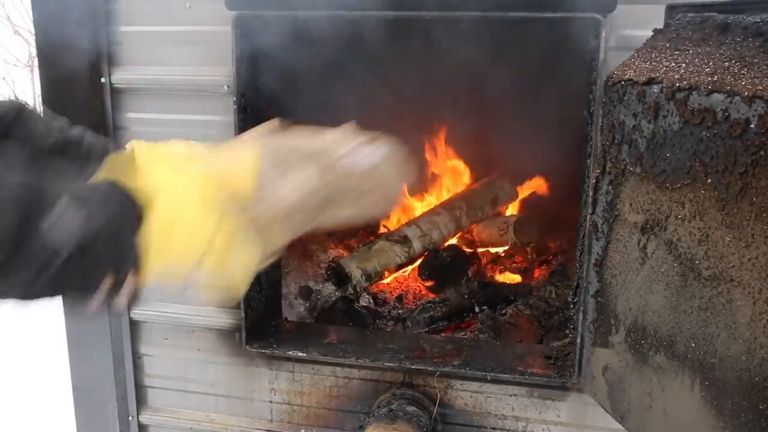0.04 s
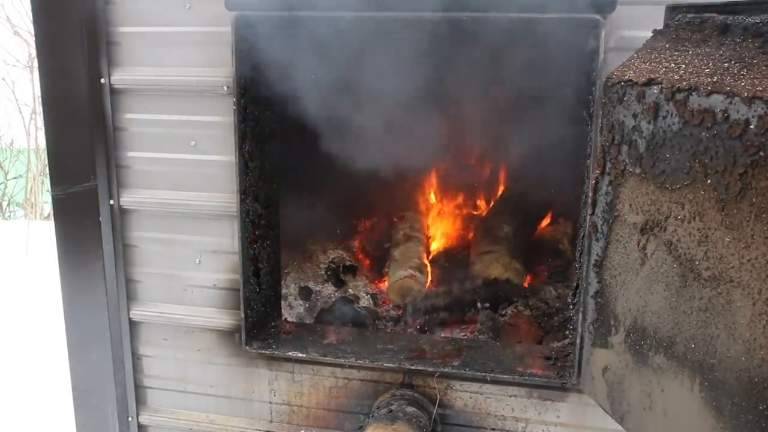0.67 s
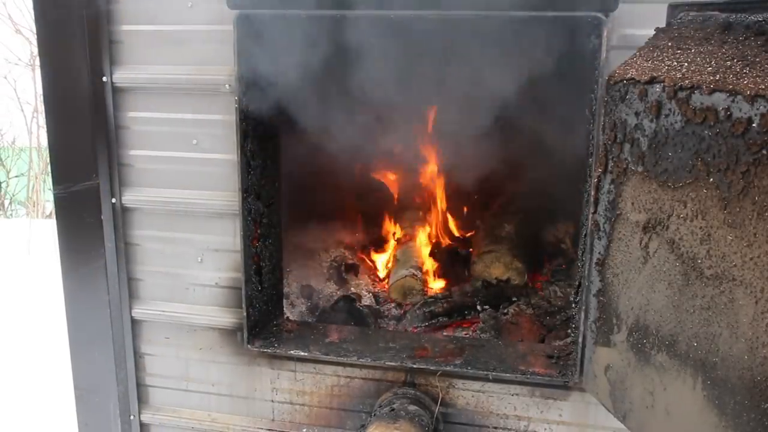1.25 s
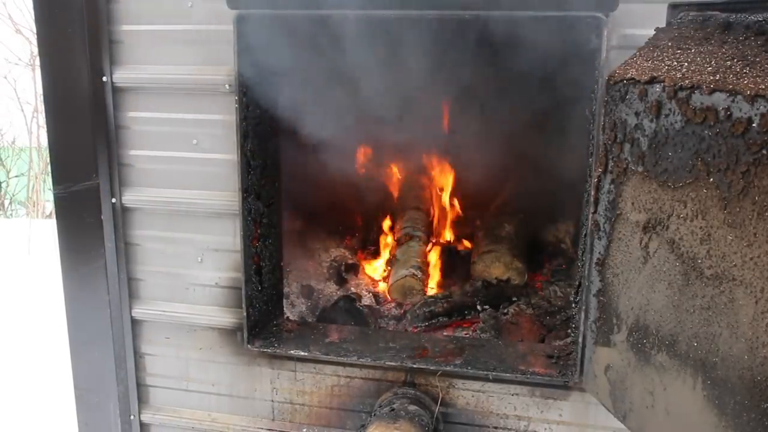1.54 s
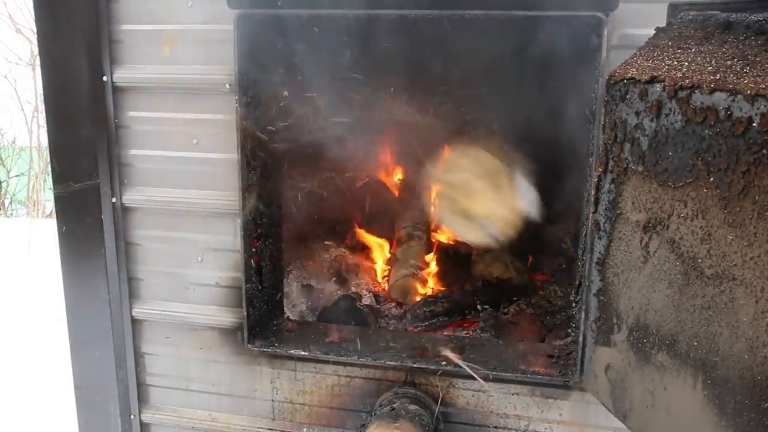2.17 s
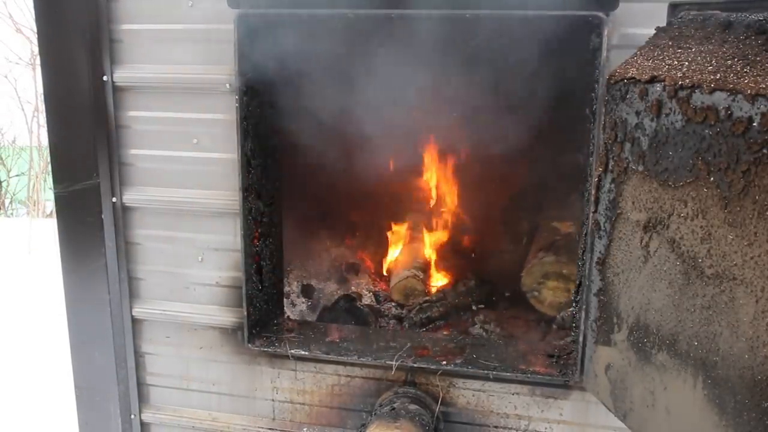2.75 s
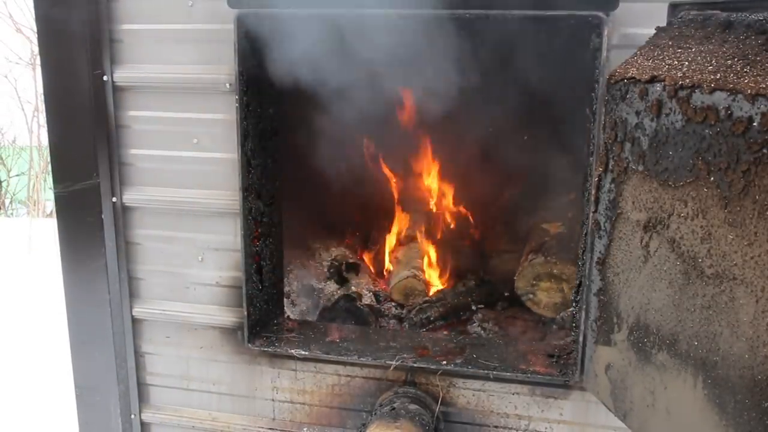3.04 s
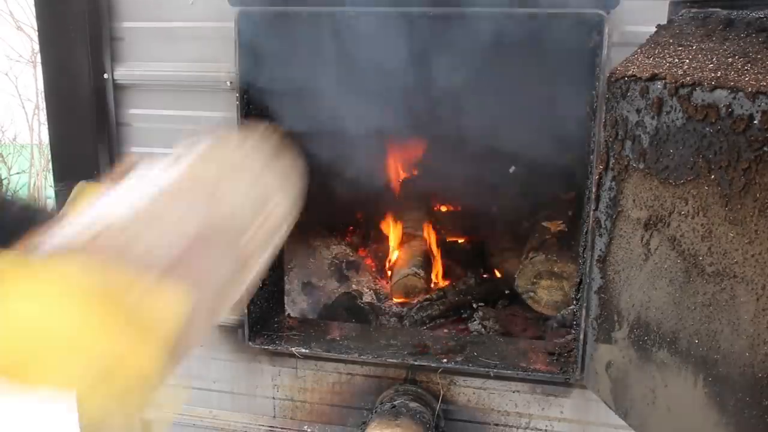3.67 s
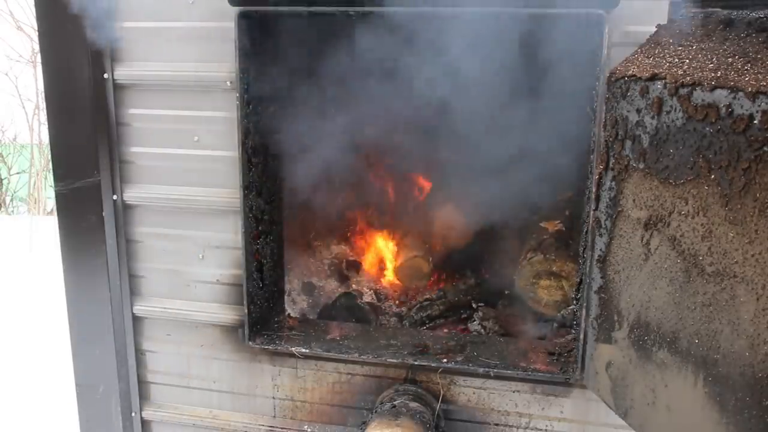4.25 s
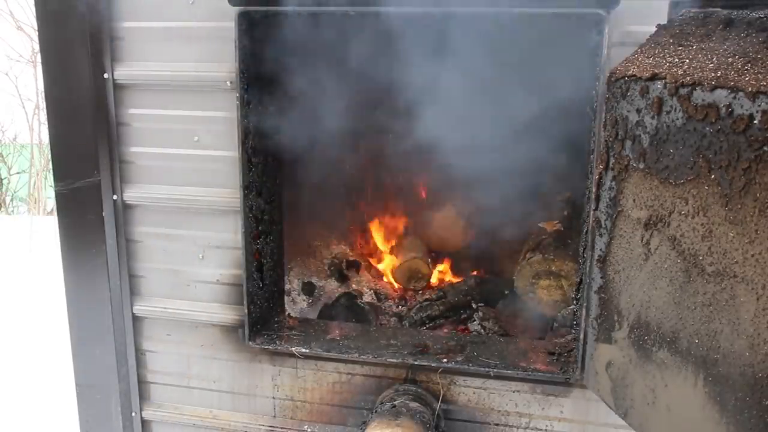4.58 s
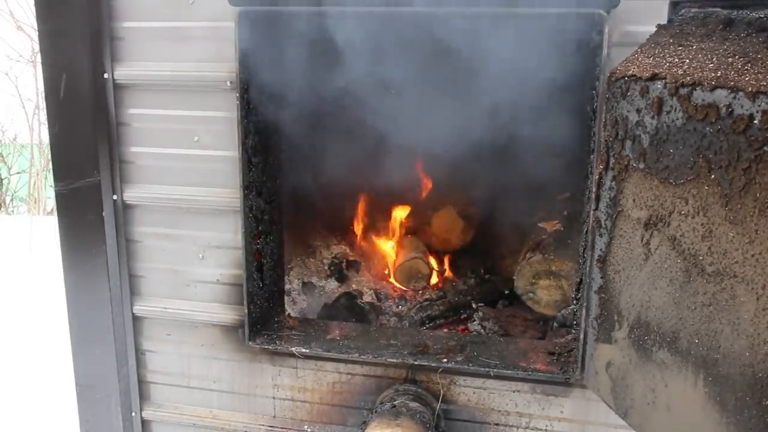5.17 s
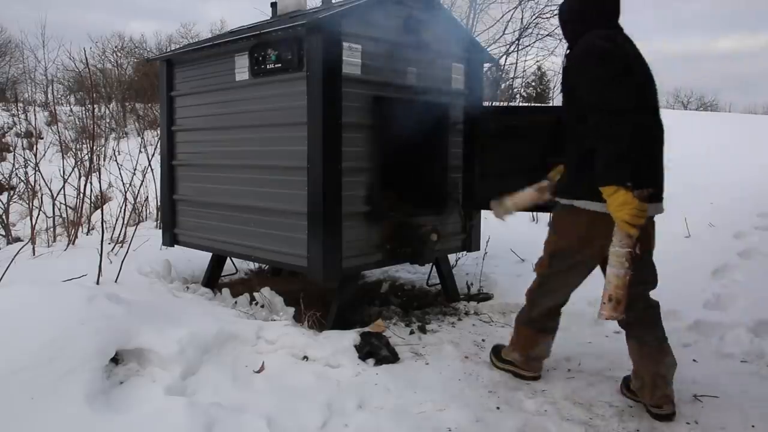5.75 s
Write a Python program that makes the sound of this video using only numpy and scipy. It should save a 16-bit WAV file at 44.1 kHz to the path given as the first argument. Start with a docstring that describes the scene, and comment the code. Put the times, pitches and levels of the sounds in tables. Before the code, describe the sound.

Outdoors, right in front of a steel firebox, three logs are tossed one after another into a popping fire. Each lands with a sharp wooden knock, crushing charcoal and stirring a brief surge of flame and sizzle; the second also makes the metal wall boom. A jacket swishes and a glove rasps on bark with the later throws. Footsteps crunch in snow in between and at the end, as the fire grows quieter.

```python
"""A fire pops and sizzles in an outdoor wood furnace, while boots crunch in snow and a jacket swishes.
At 0.4 s a split log lands in the steel firebox, knocks on the burning wood and crushes the coals.
At 2 s a glove rasps as it lets go of a second log, which makes the wall boom. Thin squeaks follow.
A third log lands at 4.2 s. Like the others it stirs up the embers; then more steps crunch in the snow."""
import sys
import numpy as np
from scipy import signal
from scipy.fft import rfft, irfft, next_fast_len
from scipy.io import wavfile
from scipy.ndimage import uniform_filter1d, minimum_filter1d

SR = 44100
rng = np.random.default_rng(int(sys.argv[2]) if len(sys.argv) > 2 else 0)


def dump(signal):
    """Clip the signal to [-1, 1] and save it as 16-bit WAV at the path in sys.argv[1]."""
    limited = np.clip(np.atleast_2d(signal).T, -1, 1)
    pcm = np.round(limited * 32767).astype(np.int16)
    wavfile.write(sys.argv[1], SR, pcm)


N = 265349
TIME = np.arange(N) / SR

# The hiss of stirred embers and of packed snow. Each row: frequency in Hz, level in dB.
FINE_HISS = [(1200, -31.5), (2200, -10.5), (4000, -11.5), (6000, -11), (9000, -16), (12000, -27.5),
             (16000, -38)]


def from_db(db):
    """Turn decibels into a factor to multiply a sound by."""
    return np.exp(np.asarray(db) * (np.log(10) / 20))


def rms_one(x):
    """Scale a sound to an average power of 1."""
    return x / np.sqrt(np.mean(x ** 2) + 1e-20)


def add(track, start_s, sound):
    """Mix a sound into a track at the given time."""
    start = int(start_s * SR)
    track[start:start + len(sound)] += sound[:N - start]


def band(x, low_hz, high_hz):
    """Gently turn down everything outside two frequencies."""
    return signal.sosfilt(signal.butter(1, [low_hz, min(high_hz, .45 * SR)], "band", fs=SR, output="sos"), x)


def swell(age, rise_s, hold_s, fade_s):
    """A level that rises, holds and fades. A fade time, here and below, is the time to drop 60 dB."""
    return np.clip(age / rise_s, 0, 1) * from_db(-60 * np.maximum(age - hold_s, 0) / fade_s)


def coloured(x, spectrum):
    """Shape the tone of a noise with rows of frequency in Hz and level in dB; its power becomes 1."""
    hz, db = np.transpose(spectrum)
    hz = np.r_[hz[0] / 4, hz, hz[-1] * 4]
    db = np.r_[db[0] - 30, db, db[-1] - 30]
    size = next_fast_len(N, real=True)
    log_hz = np.log(np.fft.rfftfreq(size, 1 / SR) + 1)
    gain = from_db(np.interp(log_hz, np.log(hz), db))
    return rms_one(irfft(rfft(x, size) * gain, size)[:N])


def grainy(size, per_s, spread_db):
    """Noise whose strength jumps from one tiny slip or break to the next."""
    noise = rng.standard_normal(size)
    grains = rng.standard_normal(size // 4 + 2).clip(-2.5, 2.5)
    flicker = np.interp(np.arange(size) * per_s / SR, np.arange(len(grains)), grains)
    return rms_one(noise * from_db(spread_db * flicker))


def bursts(rows, octaves, spread_db, rise_s):
    """Grainy noise around a pitch swells, holds and dies away, once for each row."""
    out, t = np.zeros(N), TIME[:SR // 3]
    half_width = 2 ** (octaves / 2)
    for start, db, hz, hold, fade in rows:
        grains = grainy(len(t), per_s=920, spread_db=spread_db)
        grains = band(grains, hz / half_width, hz * half_width)
        grains = rms_one(band(grains, hz / 7, hz * 1.77))
        add(out, start, from_db(db) * grains * swell(t, rise_s, hold, fade))
    return out


def struck(blows, tones, focus_db, rough, contact_s, low_share):
    """Each blow rings an object's tones, mostly those near one pitch; roughness draws out the contact."""
    out, touch = np.zeros(N), TIME[:SR // 20]
    hz, tone_db, fade = np.transpose(tones)
    for start, db, main_hz, stretch in blows:
        age = TIME[:int(SR * fade.max() * stretch) + 2]
        off_pitch_db = focus_db * np.log2(hz / main_hz) ** 2
        strength = from_db(db + tone_db - off_pitch_db + rng.normal(0, 0.74, len(hz)))
        decay = from_db(-60 * np.outer(1 / (fade * stretch), age))
        ring = strength @ (np.sin(2 * np.pi * np.outer(hz, age)) * decay)
        scrape = rng.standard_normal(len(touch)) * np.exp(-touch / contact_s)
        contact = (touch == 0) + rough * scrape / np.linalg.norm(scrape)
        low_cut = signal.butter(3, low_share * main_hz, "high", fs=SR)
        add(out, start, signal.lfilter(*low_cut, signal.fftconvolve(ring, contact)))
    return out


def pop(hz, snap_s=0.00099, spit_db=-25, spit_s=0.025):
    """One sharp snap, shorter the higher it is, and a faint spit."""
    t = TIME[:SR // 30]
    snap = np.exp(-t / (snap_s * np.sqrt(5000 / hz)))
    spit = from_db(spit_db) * np.exp(-t / spit_s)
    burst = rng.standard_normal(len(t)) * (snap + spit)
    burst[0] += 5   # the opening click
    burst = band(burst, hz / 1.27, hz * 1.19)
    return burst / np.abs(burst).max()


def crackle(per_s, spread_db):
    """Small pops of many sizes and pitches come at random times."""
    out = np.zeros(N)
    kinds = [pop(hz) for hz in np.geomspace(3000, 12000, 12)]
    starts = np.flatnonzero(rng.random(N) < per_s / SR) / SR
    sizes = from_db(spread_db * np.minimum(rng.exponential(1, len(starts)), 3))
    for k, (start, size) in enumerate(zip(starts, sizes)):
        add(out, start, size * kinds[k % len(kinds)])
    return rms_one(out)


def fire():
    """Flames flutter and embers sizzle; embers stirred by a log flare up and crackle more densely."""
    # The steady fire. Each row: time in seconds, flame level in dB, sizzle level in dB.
    steady_levels = [(0, -47, -50), (1.4, -45.5, -48), (3.3, -49.5, -50.5), (4.0, -51.5, -50.5),
                     (4.9, -52, -54.5), (5.45, -47, -53), (5.7, -58, -67), (6.02, -56, -59)]
    # Each row: start in seconds, flame and sizzle levels in dB, hold and fade times in seconds.
    flares = [(0.422, -41.5, -37.5, 0.32, 0.83), (2.314, -39.5, -39, 0.55, 0.91),
              (4.241, -36, -38, 0.2, 0.48)]
    # The tone of the flames. Each row: frequency in Hz, level in dB.
    flame_tone = [(60, -19), (120, -15.5), (250, -7), (420, -3), (700, -5), (1200, -6.5), (2000, -12),
                  (3000, -26)]
    # The tone of the glowing embers. Each row: frequency in Hz, level in dB.
    glow_tone = [(1200, -2), (2200, -9.5), (4000, 0.5), (6500, -1.5), (9500, -5), (13000, -14),
                 (16000, -17.5)]
    times, *levels = np.transpose(steady_levels)
    flame_gain, glow_gain = from_db([np.interp(TIME, times, db) for db in levels])
    flare_gain, stir_gain = 0, 0
    for start, flame_db, sizzle_db, hold, fade in flares:
        surge = swell(TIME - start, 0.014, hold, fade)
        flare_gain += from_db(flame_db) * surge
        stir_gain += from_db(sizzle_db) * surge
    flame = coloured(grainy(N, per_s=50, spread_db=3.0), flame_tone)
    glow = from_db(-2.5) * coloured(grainy(N, per_s=1800, spread_db=7.0), glow_tone)
    glow += from_db(-1.5) * crackle(per_s=190, spread_db=8.0)
    stirred = from_db(-2.5) * coloured(grainy(N, per_s=2100, spread_db=4.0), FINE_HISS)
    stirred += from_db(-6.5) * crackle(per_s=270, spread_db=5)
    return np.hypot(flame_gain, flare_gain) * flame + glow_gain * glow + stir_gain * stirred


def loud_snaps():
    """Sharp pops and a few lower snaps and knocks stand out above the crackle."""
    # Each row: start in seconds, peak level in dB, pitch in Hz.
    snaps = [(.0168, -17.5, 4640), (0.1452, -21.5, 3800), (.3132, -24, 3930), (0.7108, -5, 3900),
             (0.7572, -11, 5840), (1.0912, -13.5, 5640), (1.513, -15, 5500), (1.691, -12, 3930),
             (1.7445, -4, 7900), (2.1582, -22.5, 5500), (2.1735, -18.5, 5150), (2.577, -17.5, 7200),
             (2.8695, -24, 5030), (2.8908, -15, 5800), (3.008, -19, 1330), (3.263, -17, 6300),
             (3.326, -18, 5350), (3.933, -16, 8100), (3.99, -24, 3700), (4.0855, -21.5, 1290),
             (4.111, -13.5, 1350), (4.667, -20, 1520), (5.083, -20, 7040), (5.105, -15.5, 4930),
             (5.2684, -20.5, 7520), (5.377, -23.5, 5490), (5.4023, -13, 5560), (5.8441, -24.5, 1260)]
    out = np.zeros(N)
    for start, db, hz in snaps:
        add(out, start, from_db(db) * pop(hz))
    return out


def thuds(blows):
    """Something heavy, a heel or a log, lands on soft ground that stops its ringing quickly."""
    # Each row: pitch in Hz, level in dB, fade time in seconds.
    dull_tones = [(104, -21, 0.18), (165, -24, 0.1), (205, -8, 0.044), (295, -5.5, 0.042), (373, -1, 0.022),
                  (466, -3, 0.032), (572, -0.5, 0.013), (791, -8.5, 0.059)]
    return struck(blows, dull_tones, focus_db=8, rough=.35, contact_s=.008, low_share=.72)


def boots_in_snow():
    """The heel thuds, the crust breaks, and snow crystals give way in clumps under the rolling sole."""
    # Each row: start in seconds, heel level in dB and pitch in Hz, crust level in dB and pitch in Hz,
    # crunch and hiss levels in dB, time the sole rolls in seconds.
    steps = [(.02, -44, 300, -54, 1000, -47, -55, .12), (.937, -25.5, 415, -30, 850, -38, -36.5, 0.046),
             (.973, -33, 455, -29, 920, -57, -64, 0.017), (1.2, -39, 294, -46, 700, -40, -50, 0.13),
             (1.543, -22.5, 172, -46, 800, -49, -50, .05), (1.672, -39, 300, -42, 905, -37.5, -49, 0.072),
             (1.773, -28.5, 230, -43.5, 800, -45.5, -65, 0.022),
             (3.06, -29.5, 304, -39, 600, -38.5, -60, 0.038), (3.16, -36, 306.5, -41, 675, -41, -47, 0.076),
             (3.412, -34.5, 393, -41, 1390, -41, -41.5, 0.062),
             (4.57, -51, 400, -42.5, 900, -42.5, -47, 0.089),
             (4.739, -46, 340, -33, 1000, -40.5, -46.5, 0.032),
             (4.957, -38, 400, -48, 1000, -44.5, -47.5, 0.048),
             (5.184, -32, 292, -45, 373, -57, -52.5, 0.084), (5.263, -36, 337, -42.5, 400, -53, -48, 0.038),
             (5.428, -53, 350, -41, 1110, -54, -73, 0.038),
             (5.555, -23, 170, -51, 710, -42.5, -50.5, 0.055),
             (5.79, -22.5, 172, -40.5, 675, -50, -50.5, 0.013),
             (5.859, -28.5, 223, -37.5, 770, -48, -48.5, 0.008),
             (5.903, -45, 300, -39, 1100, -63, -57, .006)]
    heel_stretch, crust_share, crust_fade_s = 0.86, 0.43, 0.043
    heels, crusts, crunch, hiss = [], [], 0, 0
    for start, heel_db, heel_hz, crust_db, crust_hz, crunch_db, hiss_db, roll in steps:
        heels.append((start, heel_db, heel_hz, heel_stretch))
        crusts.append((start, crust_db, crust_hz, crust_share * roll, crust_fade_s))
        weight = swell(TIME - start, rise_s=0.0024, hold_s=roll, fade_s=0.14)
        crunch += from_db(crunch_db) * weight
        hiss += from_db(hiss_db) * weight
    # Each row: frequency in Hz, level in dB.
    crunch_tone = [(80, -30), (200, -6.5), (400, -1), (750, -0.5), (1300, -4.5), (2000, -10.5), (3000, -32)]
    breaks = grainy(N, per_s=300, spread_db=4.0)
    packing = crunch * coloured(breaks, crunch_tone) + hiss * coloured(breaks, FINE_HISS)
    return thuds(heels) + bursts(crusts, octaves=1.03, spread_db=1.5, rise_s=0.00048) + packing


def jacket():
    """Nylon slides over nylon in many small slips, louder as the arm speeds up, until it stops."""
    # Each row: moment of top speed in seconds, rub and hiss levels in dB, wind-up time in seconds.
    swings = [(0.144, -42.5, -39.5, 0.85), (1.278, -37.5, -33, .25), (2.031, -31.5, -29.5, 0.2),
              (3.1, -37.5, -28, 0.091), (3.616, -50.5, -49, 0.5), (3.827, -31.5, -29.5, 0.17),
              (5.083, -46, -45, 0.18), (5.478, -53.5, -40.5, .03), (5.971, -51.5, -49.5, 0.046)]
    # The cloth's low rub. Each row: frequency in Hz, level in dB.
    rub_tone = [(100, -33), (250, -11), (450, -2.5), (800, 3), (1500, 0.5), (2000, -4), (3000, -15)]
    # The cloth's high hiss. Each row: frequency in Hz, level in dB.
    hiss_tone = [(1300, -8), (2200, -0.5), (3500, 2), (5500, 0), (8000, -6), (11000, -15.5), (16000, -28)]
    wind_up_db, stop_db_per_s = 24.5, 503
    rub, hiss = 0, 0
    for peak, rub_db, hiss_db, wind_up in swings:
        swing_db = np.minimum(wind_up_db * (TIME - peak) / wind_up, stop_db_per_s * (peak - TIME))
        speed = from_db(swing_db.clip(-200))
        rub += from_db(rub_db + 4) * speed
        hiss += from_db(hiss_db + 2) * speed
    slips = grainy(N, per_s=900, spread_db=3.0)
    return rub * coloured(slips, rub_tone) + hiss * coloured(slips, hiss_tone)


def crushed_coals():
    """Charcoal and bark crunch as they break under a log."""
    # Each row: start in seconds, level in dB, pitch in Hz, hold and fade times in seconds.
    crunches = [(0.398, -16, 5300, 0.0064, 0.011), (0.4378, -11.5, 2600, 0.0029, 0.043),
                (0.455, -18.5, 4350, 0.0046, 0.019), (0.554, -30.5, 3620, 0.036, 0.029),
                (.668, -13.5, 4440, 0.0016, 0.032), (.6755, -16, 3560, 0.0077, 0.067),
                (.709, -20, 3430, 0.0021, 0.075), (2.304, -7.5, 3900, 0.0022, 0.024),
                (2.3812, -13, 4200, 0.0049, 0.067), (2.438, -22, 3700, 0.0072, 0.028),
                (2.909, -33.5, 2600, .008, 0.067), (4.109, -27.5, 1150, .004, .04),
                (4.1805, -19, 5100, 0.0019, 0.02), (4.1935, -17, 2500, .004, .06),
                (4.273, -30, 3470, 0.015, 0.066), (4.345, -35, 3970, 0.093, 0.11)]
    return bursts(crunches, octaves=2.05, spread_db=3.0, rise_s=0.00037)


def log_landings():
    """A log rings briefly as it knocks on wood or steel, and thuds on the bed of ash."""
    # Each row of both: start in seconds, level in dB, main pitch in Hz, factor on the fade times.
    knocks = [(.4005, -10.5, 960, 1), (.3995, -5.5, 5960, 0.29), (.4395, -4, 1870, 0.16),
              (.4885, -13, 1570, 0.52), (2.236, -25, 1560, 0.26), (2.3025, -9.5, 3000, 0.29),
              (2.3048, 4.5, 4400, 0.23), (2.311, -12, 1860, .66), (2.385, -16, 1210, 0.29),
              (4.1812, -2, 860, 0.4), (4.255, -22.5, 850, 0.47), (4.303, -28, 950, 0.82)]
    ash_blows = [(.4005, -4, 420, 0.52), (.4885, -22.5, 360, 1.6), (2.305, -14, 176, 2),
                 (2.905, -33, 400, .9), (2.976, -30, 400, 1), (4.1795, -5, 457, 0.96), (4.255, -16, 423, 2),
                 (4.421, -15, 500, 1.8), (4.848, -35, 450, 0.62), (4.897, -35.5, 400, 1.2)]
    # The tones of a split log. Each row: pitch in Hz, level in dB, fade time in seconds.
    log_tones = [(465, -8, .05), (830, -11, .06), (991, 1, .15), (1340, -17, .07), (1452, -4, .15),
                 (1528, -12, .12), (1728, -17, .08), (2250, -8, .08), (2762, -9, .06), (3000, -8, .06),
                 (3305, -8, .05), (3520, -8, .045), (4400, -4, .05), (5160, -5, .05), (5820, -4, .04),
                 (8200, -9, .04)]
    ringing = struck(knocks, log_tones, focus_db=22, rough=.15, contact_s=.003, low_share=.55)
    return ringing + thuds(ash_blows)


def glove():
    """The glove rasps along the bark as it lets go of a log."""
    # Each row: start in seconds, level in dB, pitch in Hz, hold and fade times in seconds.
    rasps = [(2.024, -20, 1500, 0.01, 0.035), (3.817, -24, 1570, 0.019, 0.087)]
    return bursts(rasps, octaves=0.72, spread_db=3.0, rise_s=0.0051)


def wall_boom():
    """The steel wall booms as a log strikes it and settles against it."""
    # Each row: start in seconds, level in dB, main pitch in Hz, factor on the fade times.
    blows = [(2.384, -12, 650, 0.14), (2.4415, -16, 500, 0.09), (2.446, -15, 415, 0.88),
             (2.467, -23, 448, 0.059), (2.487, -25, 384, 0.23), (4.256, -27, 119, 0.41)]
    # The tones of the wall. Each row: pitch in Hz, level in dB, fade time in seconds.
    steel_tones = [(116, -22, 0.78), (172, -7, 0.96), (309, -9, 0.67), (342, -7, 0.32), (400, -4.5, 0.65),
                   (426, -8, 0.87), (483, -1, 0.33), (508, 0, 0.27), (549, -4, 0.58), (584, -9.5, 0.73),
                   (710, -10, 0.083), (795, -5, 0.37), (1125, -5, 0.23)]
    return struck(blows, steel_tones, focus_db=7, rough=.2, contact_s=.008, low_share=.65)


def thin_squeaks_and_hiss():
    """Brief, thin squeaks and a high hiss, each a narrow band of noise."""
    # Each row: start in seconds, level in dB, pitch in Hz, hold and fade times in seconds.
    thin_sounds = [(2.822, -32.5, 2580, 0.0095, 0.02), (3.56, -42.5, 2200, 0.05, 0.058),
                   (5.16, -50.5, 8040, 0.13, 0.32)]
    return bursts(thin_sounds, octaves=0.19, spread_db=2.0, rise_s=0.01)


def firebox(x, echo_db, fade_s):
    """Sound bounces between the sooty steel walls in many short echoes."""
    t = TIME[:SR // 2]
    echoes = band(rng.standard_normal(len(t)), 130, 6200) * from_db(-60 * t / fade_s) * (t > .003)
    return x + from_db(echo_db) * signal.oaconvolve(x, echoes / np.linalg.norm(echoes))[:N]


def scene():
    """Everything is heard from straight ahead by two microphones close together."""
    echoing = loud_snaps() + crushed_coals() + log_landings() + wall_boom() + thin_squeaks_and_hiss()
    sound = fire() + firebox(echoing, echo_db=-17.5, fade_s=0.14)
    sound = sound + boots_in_snow() + jacket() + glove()
    return np.array([np.interp(TIME + lag_s, TIME, sound) for lag_s in (8e-7, -8e-7)])


def record(dry):
    """A wind filter thins the bass, a limiter holds down the hardest knocks; faint noise is added."""
    x = signal.sosfilt(signal.butter(2, 110, "high", fs=SR, output="sos"), dry)
    ceiling = 1.2   # a little over full scale, so the peaks still clip slightly
    gain = ceiling / np.maximum(np.abs(x).max(axis=0), ceiling)
    gain = uniform_filter1d(minimum_filter1d(gain, size=40), size=40)
    x = np.clip(x * gain, -1, 1)
    # The background rumble. Each row: frequency in Hz, level in dB.
    rumble_tone = [(20, 5), (60, -4.5), (150, -6), (400, -12), (2000, -26)]
    shared, apart = [coloured(noise, rumble_tone) for noise in rng.standard_normal((2, N))]
    x += from_db(-71) * (shared + from_db(-4.5) * np.array([apart, -apart]))
    x += from_db(-76) * rng.standard_normal((2, N))   # faint hiss, different in each channel
    x += from_db(-63) * rng.standard_normal(N)   # amplifier hiss
    treble_cut = signal.ellip(12, .1, 90, 16200, fs=SR, output="sos")
    return signal.sosfilt(treble_cut, x)


dry = scene()
out = record(dry)
dump(out)
```